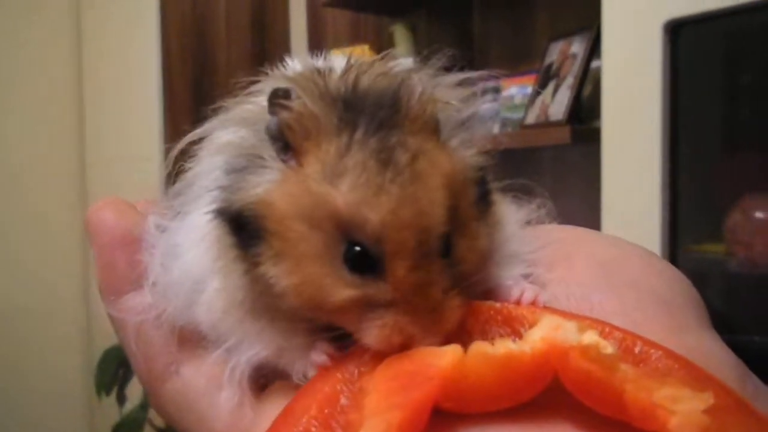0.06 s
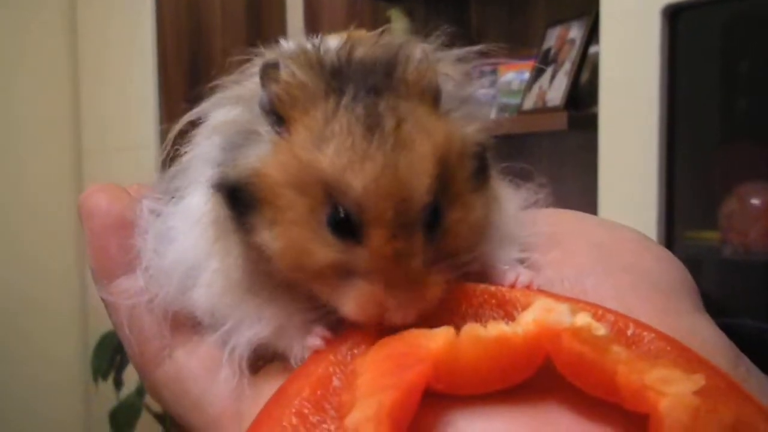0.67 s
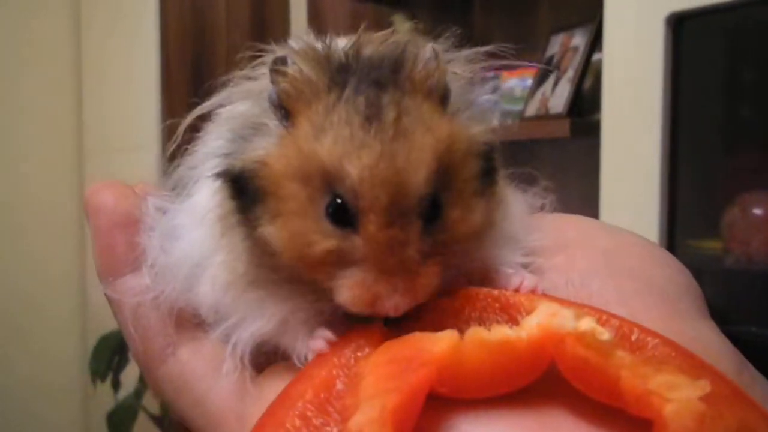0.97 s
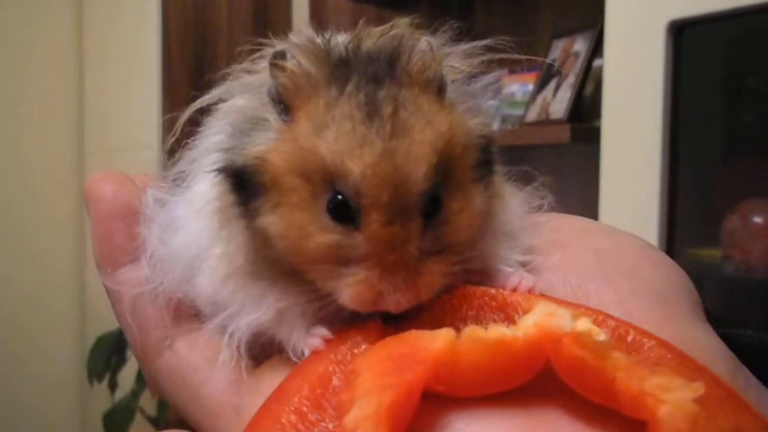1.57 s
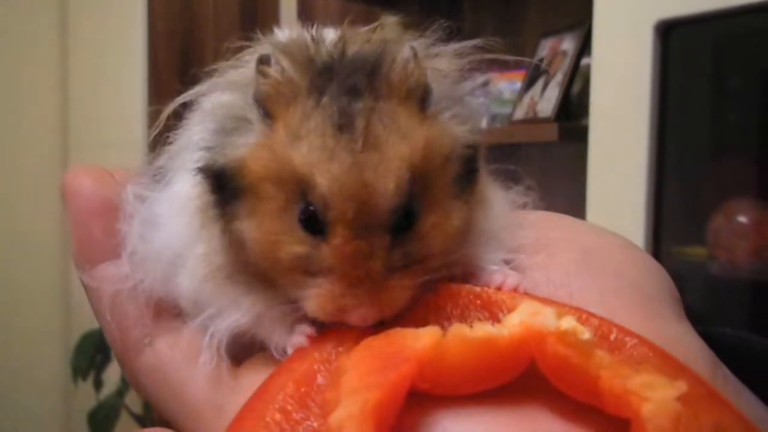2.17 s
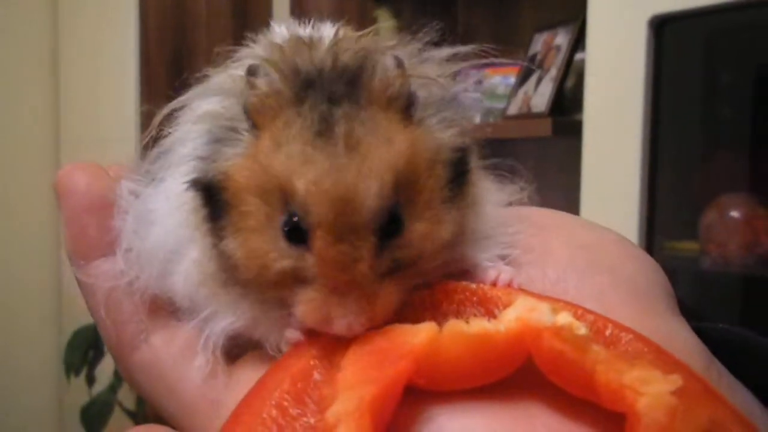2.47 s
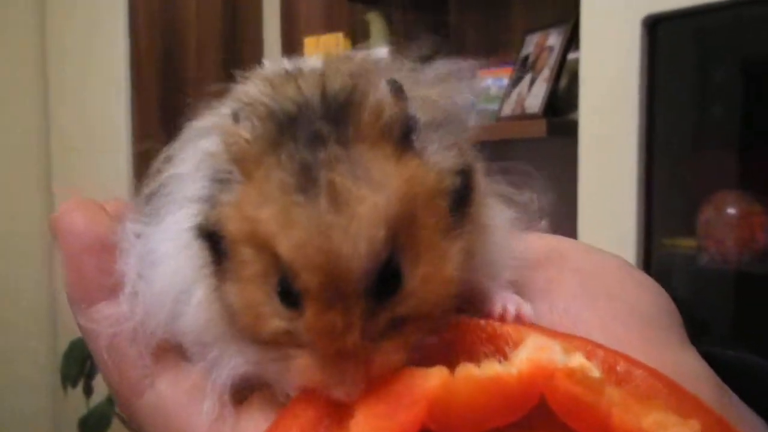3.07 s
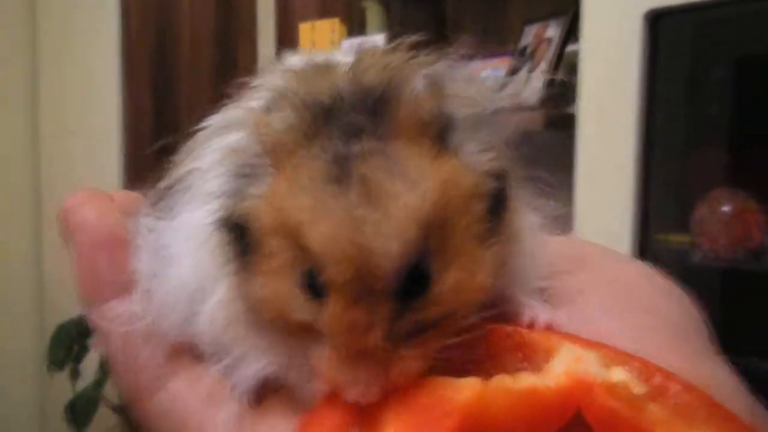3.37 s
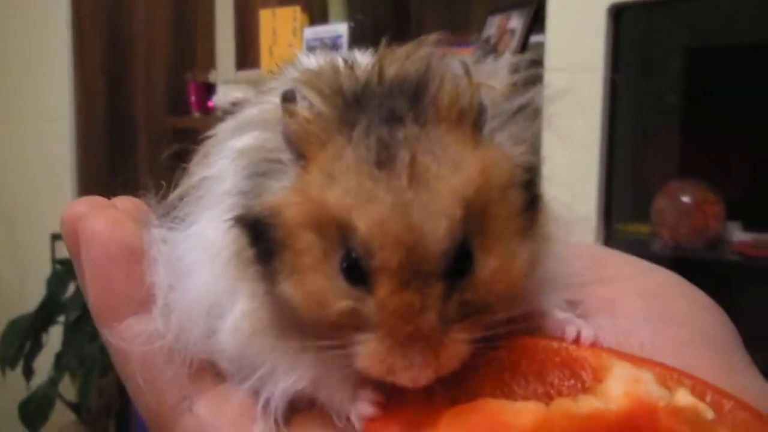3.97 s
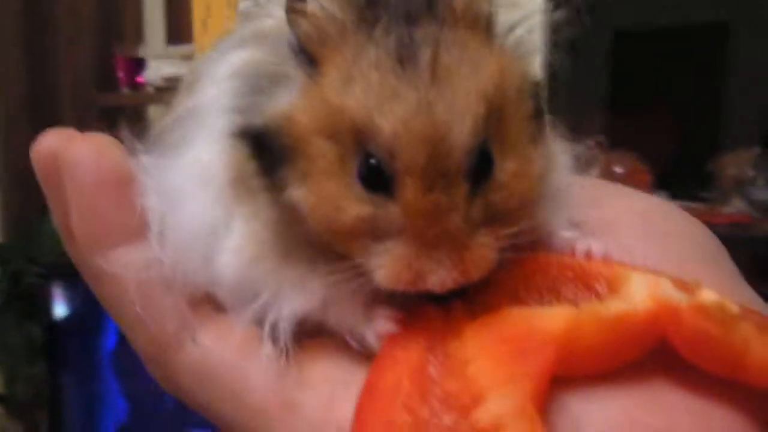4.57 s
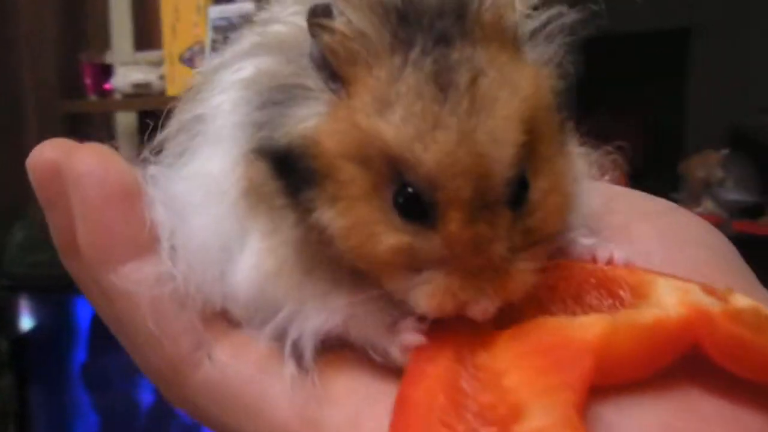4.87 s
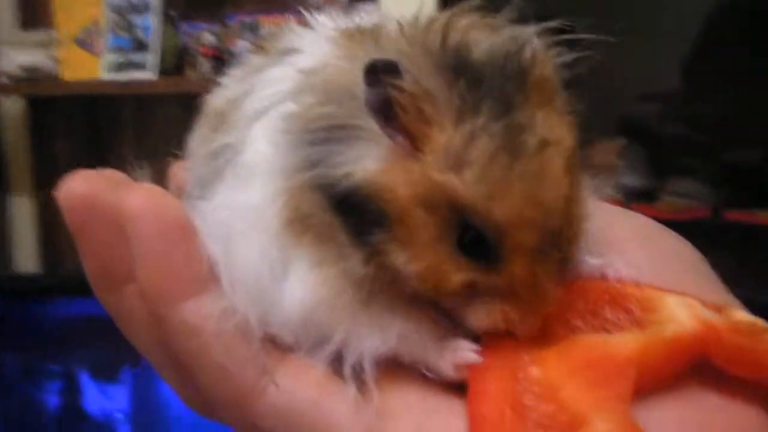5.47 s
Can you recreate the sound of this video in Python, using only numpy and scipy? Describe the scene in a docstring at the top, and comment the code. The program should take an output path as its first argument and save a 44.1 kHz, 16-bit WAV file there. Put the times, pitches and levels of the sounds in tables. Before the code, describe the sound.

A hamster nibbles a slice of bell pepper very close to a handheld microphone, in a quiet room with a faint steady hiss. Sharp little snaps open at about 0.2 seconds, with a light handling tap and creak. From 1 to 2.2 seconds the bites come in a quick run of tiny, bright, crisp crunches, several a second. They thin out, a small creak of the microphone's case comes at 2.8 seconds, and more crunches cluster from 3.1 to 3.4 seconds. At 3.5 seconds a finger slips on the case with a loud, juddering crack, the loudest sound, trailing into a brief hollow creak and low rubbing. Nibbling resumes around 3.9 seconds. Hollow finger knocks land at about 4.3, 4.6 and 5 seconds, with soft rubs between them, while scattered crisp snaps continue until the end at about 5.6 seconds.

```python
"""Hamster nibbling bell pepper

A hamster on a hand eats a slice, very close to a handheld camera in a quiet room.
Each bite is a quick run of tiny snaps of the crisp flesh, ringing briefly in the small mouth.
Fingers knock, creak and rub on the camera; once a grip slides and judders with a loud crack."""
import sys
import numpy as np
from scipy import signal
from scipy.fft import rfft, irfft
from scipy.io import wavfile
from scipy.ndimage import uniform_filter1d

SR = 44100
rng = np.random.default_rng(int(sys.argv[2]) if len(sys.argv) > 2 else 0)


def wav_out(sig):
    """Save sig, one row per channel (or a flat mono array), as 16-bit PCM at SR to the path in sys.argv[1]."""
    wavfile.write(sys.argv[1], SR, np.round(np.clip(np.atleast_2d(sig).T, -1, 1) * 32767).astype(np.int16))


N = 247393
BAND_LIMIT_HZ = 16000
HZ = np.maximum(np.fft.rfftfreq(4096, 1 / SR), 1)  # frequency axis of the gain curves


# Bites, and airy rustles at 2.346 s and 4.732 s:
# (start [s], end [s], level [dB], tilt [dB/oct], mouth ring [dB])
BITES_AND_RUSTLES = [(0.124, 0.173, -66, 2, 15.5), (0.283, 0.303, -52, 3, 3), (0.342, 0.371, -55.5, 5.5, 4),
                     (0.761, 0.78, -66.5, -1, 19), (1.154, 1.178, -52, -3, 18.5),
                     (1.257, 1.27, -51.5, -1.5, 17), (1.376, 1.398, -56, -3, 17.5),
                     (1.5, 1.509, -43, -1, 14), (1.518, 1.535, -54.5, 3, 14), (1.631, 1.647, -44, 0.5, 13),
                     (1.657, 1.663, -40, 1, 13.5), (1.777, 1.796, -50.5, -1, 15),
                     (1.885, 1.899, -42, 1, 13.5), (1.904, 1.921, -41, 3, 10),
                     (2.055, 2.066, -47, -2, 16.5), (2.069, 2.113, -55, 2.5, 10.5),
                     (2.2, 2.219, -45, 0.5, 16.5), (2.346, 2.367, -63, 12, -3),
                     (2.756, 2.791, -61.5, 1, 18.5), (2.906, 2.949, -61.5, 1, 17.5),
                     (3.088, 3.125, -55, -0.5, 15.5), (3.143, 3.176, -56, 4.5, 14),
                     (3.211, 3.3, -59.5, 5.5, 4), (3.321, 3.349, -55.5, 8, 5), (3.36, 3.378, -53, 8, 3),
                     (3.945, 3.966, -53.5, 5, 10.5), (4.01, 4.017, -43.5, 1, 5),
                     (4.127, 4.133, -35.5, 0, 3), (4.235, 4.251, -44, 5.5, 10), (4.732, 4.769, -60, 8.5, 0),
                     (4.978, 4.99, -46, 1.5, 11.5)]


def bites_and_rustles(snaps_per_run=5.5, min_gap_s=.0022, max_gap_s=.02,
                      crackle_db=-8, lead_s=.006, lag_s=.0027):
    """Bites and two faint airy rustles: short runs of tiny snaps and crackle."""
    out = np.zeros(N)
    for start, end, db, tilt_db, ring_db in BITES_AND_RUSTLES:
        length_s = max(end - start, min_gap_s)
        gap_s = np.clip(length_s / snaps_per_run, min_gap_s, max_gap_s)
        breaks = jerks(length_s + gap_s / 2, gap_s, scatter=0.27, scatter_db=3.5)
        breaks *= arch(len(breaks), edge_db=-1.5)
        breaks *= np.sqrt(length_s * SR) / np.linalg.norm(breaks)
        variants = [snap(start, tilt_db + 2 * tilt_shift, ring_db + 3 * ring_shift, uneven_db=2)
                    for tilt_shift, ring_shift in rng.uniform(-1, 1, (7, 2))]
        for k, at in enumerate(np.flatnonzero(breaks)):
            add(out, start + at / SR, amp(db) * breaks[at] * variants[k % len(variants)])
        crackle = grains(N // 20, per_s=1500, spread_db=4)[:round((lead_s + length_s + lag_s) * SR)]
        crackle *= signal.windows.tukey(len(crackle), .5)
        response = fracture(tilt_db, ring_db, jaw_factor(start), uneven_db=5.5)
        add(out, start - lead_s, amp(db + crackle_db) * signal.fftconvolve(crackle, response))
    return out


# Pepper skin breaks: (time [s], level [dB], tilt [dB/oct], mouth ring [dB])
SKIN_SNAPS = [(0.2251, -22, 3, 3), (0.2534, -19, 3.5, 13.5), (0.5167, -27.5, 4, 2), (0.658, -33.5, 6.5, 11),
              (0.968, -40, -2, 15), (1.162, -27.5, -7, 21.5), (1.1892, -35, 2, 16),
              (1.2556, -18.5, 4, 15.5), (1.5712, -33.5, 15, -2), (2.421, -42.5, -5, 24),
              (2.7575, -37.5, -13, 21.5), (3.0855, -30, -5, 15), (3.1903, -28, 7, 14.5),
              (3.3615, -29, 11.5, 16), (3.374, -20, 2.5, 7), (3.6273, -29, 7, -1), (3.917, -33, 12, -4),
              (4.94, -25.5, -2.5, -10), (5.0937, -31, 16, -2), (5.1176, -30, 11, -1),
              (5.3114, -26.5, -3, 5), (5.3804, -26.5, -4, 2), (5.5683, -32, 3.5, 16)]


def skin_snaps():
    """The tough skin gives way in single sharp snaps."""
    out = np.zeros(N)
    for time_s, db, tilt_db, ring_db in SKIN_SNAPS:
        add(out, time_s, amp(db) * snap(time_s, tilt_db, ring_db))
    return out


def snap(time_s, tilt_db, ring_db, uneven_db=4.5, run_on=0.75, decay_s=0.00075):
    """One break tears a few neighbouring cells within a millisecond or two."""
    t = np.arange(SR // 300) / SR
    tear = grains(len(t), per_s=9000, spread_db=-6.5) * np.exp(-t / decay_s)
    tear *= run_on / np.linalg.norm(tear)
    tear[0] = 1
    flesh = fracture(tilt_db, ring_db, jaw_factor(time_s), uneven_db)
    return signal.fftconvolve(tear / np.linalg.norm(tear), flesh)


# Bare snap spectrum: (frequency [Hz], gain [dB])
FLESH_SPECTRUM = [(200, -10.5), (1200, -3), (3200, -1.5), (4600, -1.5), (7000, 0), (9500, -2), (13000, -3),
                  (16000, -3)]
# Resonances around the teeth: (frequency [Hz], width [Hz], gain [dB])
MOUTH_MODES = [(5720, 296, 3.5), (6200, 730, -0.5), (6950, 270, -11.5), (10200, 970, -8),
               (11600, 800, -9.5)]


def fracture(tilt_db, ring_db, jaw=1, uneven_db=2):
    """One fracture of the flesh, with its own uneven colour, plus its ring in the mouth."""
    modes = [(hz * jaw, width_hz, db) for hz, width_hz, db in MOUTH_MODES]
    mouth_ring = np.hypot(1, amp(ring_db) * resonances(modes)) - 1
    ripple = np.interp(HZ, np.linspace(0, BAND_LIMIT_HZ, 14), rng.standard_normal(14))
    bare = spectrum(FLESH_SPECTRUM, HZ) * slope(tilt_db, pivot_hz=6030, flat_below_hz=3280)
    return impulse(bare * (amp(uneven_db * ripple) + mouth_ring))


# Mouth tuning: (time [s], frequency factor [ratio])
JAW_TUNING = [(0.2, 1.06), (0.75, 1.05), (1.2, 0.98), (1.9, 1.01), (2.8, 0.96), (3.35, 0.97), (4.0, 0.88),
              (4.24, 0.91), (5.0, 0.96)]


def jaw_factor(time_s):
    """The mouth opens and shifts its resonances."""
    return np.interp(time_s, *np.transpose(JAW_TUNING))


def chewing(level_db=-78, rest_from_s=3.8, rest_db=-9):
    """Faint wet ticks of the jaw, weaker once the hamster slows down."""
    effort = amp(rest_db * (np.arange(N) / SR > rest_from_s))
    ticks = effort * grains(N, per_s=25, spread_db=2.5)
    return amp(level_db) * signal.oaconvolve(ticks, fracture(tilt_db=1, ring_db=18))[:N]


# Camera case resonances: (frequency [Hz], width [Hz], gain [dB])
CASE_MODES = [(140, 56, -21.5), (303, 130, -10.5), (507, 34, 5), (664, 90, 1), (893, 150, -3.5),
              (1133, 96, -2), (1527, 140, -6), (1863, 195, -3), (2150, 140, -5.5), (2470, 120, -3),
              (2980, 360, -4), (3630, 870, -15), (4510, 680, -12), (5450, 530, -16.5), (7350, 660, -29),
              (8800, 760, -19.5), (11100, 1100, -28.5), (14300, 1700, -32)]
# Grip slips: (start [s], end [s], level [dB], tilt [dB/oct])
JUDDERS = [(3.5063, 3.5287, 15, -1.5), (3.5545, 3.564, -0.5, 2)]


def crack(fade_db=-8, lead_s=0.00035):
    """A sticking grip lets go: a fading run of stick-slip jerks rings the case."""
    out, case = np.zeros(N), resonances(CASE_MODES)
    for start, end, db, tilt_db in JUDDERS:
        slips = jerks(end - start, gap_s=.0016, scatter=0.48, scatter_db=3.5)
        slips *= np.sqrt(np.count_nonzero(slips)) * amp(np.linspace(0, fade_db, len(slips)))
        ring = impulse(case * slope(tilt_db, pivot_hz=1000, flat_below_hz=403), spread_s=0.000505)
        add(out, start - lead_s, -amp(db) * signal.fftconvolve(slips, ring))
    return out


# Light rub, case damped by the hand: (frequency [Hz], gain [dB])
DAMPED_SPECTRUM = [(100, -38), (400, -7.5), (700, 1), (1150, -4.5), (1700, -15), (3000, -16.5),
                   (4400, -14.5), (6500, -20.5), (9000, -32), (16000, -39)]
# Finger strokes: (start [s], peak [s], end [s], level [dB], tilt [dB/oct], bass [dB], case ring [0-1])
RUBS = [(3.453, 3.52, 3.545, -23, 5.5, 20, 1), (3.474, 3.484, 3.505, -45, 2, 2, 0.9),
        (3.504, 3.51, 3.535, -8, -1.5, -18, 0.7), (3.549, 3.549, 3.588, -18.5, -1, 14, 0.24),
        (3.618, 3.639, 3.690, -32, 2.5, 26.5, 0.6), (3.633, 3.679, 3.730, -36, 3, 28.5, 0.77),
        (3.681, 3.742, 3.880, -49.5, 4.5, 18, 0.9), (4.300, 4.312, 4.350, -41, 1, 5, 0.7),
        (4.647, 4.67, 4.780, -36.5, 1, 6, 0.35), (4.83, 4.836, 4.93, -33, 2.5, 9.5, 0.2),
        (5.018, 5.05, 5.105, -32, 3, 10, 0.1), (5.08, 5.107, 5.210, -41, 1.5, 1, 0),
        (5.400, 5.423, 5.460, -39, 1.5, 2, 0.4), (5.484, 5.56, 5.660, -40.5, 1.5, -6, 0.36)]


def rubs(bass_hz=480, rumble_db=-20, rumble_hz=150):
    """Skin slides on the case: friction grains swell and fade, ring it and shake the camera."""
    out, case, damped = np.zeros(N), resonances(CASE_MODES), spectrum(DAMPED_SPECTRUM, HZ)
    shake = amp(rumble_db) / np.hypot(1, (HZ / rumble_hz) ** 3) / np.hypot(1, (rumble_hz / 2 / HZ) ** 2)
    for start, peak, end, db, tilt_db, bass_db, ring in RUBS:
        t = np.arange(start, end, 1 / SR)
        stroke = np.interp(t, [start, peak, end], [0, 1, 0]) ** 1.1
        friction = grains(N // 10, per_s=6000, spread_db=1)[:len(t)]
        colour = case ** ring * damped ** (1 - ring) * slope(tilt_db, pivot_hz=1040, flat_below_hz=393)
        bass_shelf = amp(bass_db / (1 + (HZ / bass_hz) ** 4))
        response = impulse(colour * bass_shelf + shake)
        add(out, start, amp(db) * signal.fftconvolve(stroke * friction, response))
    return out


# Grip taps: (time [s], tick level [dB], low edge [Hz], high edge [Hz], thud level [dB])
KNOCKS = [(0.2530, -12.5, 550, 2500, -13), (1.2078, -14, 3000, 5000, -30), (4.2570, 0, 2100, 6340, 9),
          (4.2964, 4, 2070, 3270, -4), (4.3114, -11.5, 2900, 6000, -7), (4.5679, -1.5, 2230, 3270, -16),
          (4.9938, 1.5, 880, 5400, -7.5)]


def knocks():
    """Each tap is a hollow tick plus a thud."""
    out, body = np.zeros(N), thud(spread_s=0.00036)
    for time_s, tick_db, low_hz, high_hz, thud_db in KNOCKS:
        add(out, time_s, amp(tick_db) * tick(low_hz, high_hz) + amp(thud_db) * body)
    return out


# Case creaks: (start [s], end [s], relative level [dB], low edge [Hz], high edge [Hz])
CREAKS = [(0.294, 0.309, -12.5, 1510, 2300), (2.814, 2.822, 1, 2200, 2970)]


def creaks(level_db=7, thud_db=-11):
    """The case creaks under the fingers: a few almost evenly spaced ticks swell and fade."""
    out, body = np.zeros(N), amp(thud_db) * thud()
    for start, end, db, low_hz, high_hz in CREAKS:
        slips = jerks(end - start, gap_s=.00243, scatter=0.065, scatter_db=0.5)
        slips *= arch(len(slips), edge_db=-9)
        add(out, start, amp(db + level_db) * signal.fftconvolve(slips, tick(low_hz, high_hz) + body))
    return out


# Grip tick resonances: (frequency [Hz], width [Hz], gain [dB])
TICK_MODES = [(1090, 710, 2), (1670, 310, -5), (2320, 180, -10), (2760, 350, -7.5), (4090, 850, -5),
              (6800, 2800, -7.5)]


def tick(low_hz, high_hz, echo_db=-11, echo_s=0.000874):
    """A band-limited tick in the grip, made hollow by an echo across the case."""
    band = 1 / np.hypot(1, (low_hz / HZ) ** 5) / np.hypot(1, (HZ / high_hz) ** 4)
    hollow = abs(1 + amp(echo_db) * np.exp(-2j * np.pi * HZ * echo_s))
    return impulse(resonances(TICK_MODES) * band * hollow, spread_s=0.00021)


# Whole-camera resonances: (frequency [Hz], width [Hz], gain [dB])
THUD_MODES = [(165, 154, -0.5), (545, 87, -1.5), (986, 240, -6)]


def thud(spread_s=0):
    """A tap shakes the whole camera."""
    return impulse(resonances(THUD_MODES), spread_s)


# Stick-slip notes: (start [s], end [s], centre pitch [Hz], level [dB])
GROANS = [(3.521, 3.549, 515, -32), (3.552, 3.586, 520, -31.5)]


def groans(sag_hz=80, jitter=0.15, overtone_db=-16):
    """Sliding skin locks on to a low case mode: a short, hollow note that wobbles and sags."""
    out = np.zeros(N)
    for start, end, hz, db in GROANS:
        t = np.arange(start, end, 1 / SR)
        wobble = uniform_filter1d(rng.standard_normal(N // 10), size=100)
        sag = np.linspace(sag_hz, -sag_hz, len(t))
        pitch_hz = hz * (1 + jitter * wobble[:len(t)] / wobble.std()) + sag
        phase = 2 * np.pi * np.cumsum(pitch_hz) / SR
        note = np.sin(phase) + amp(overtone_db) * np.sin(2 * phase)
        add(out, start, amp(db) * note * signal.windows.tukey(len(t), .5))
    return out


def room(direct, wet_db=-22, t60_s=0.26, predelay_s=.006):
    """The furnished room adds a faint, short tail of uneven reflections."""
    t = np.arange(SR // 3) / SR
    tail = grains(len(t), per_s=6200, spread_db=18) * amp(-60 * t / t60_s) * (t > predelay_s)
    return direct + amp(wet_db) * signal.oaconvolve(direct, tail / np.linalg.norm(tail))[:N]


# Room tone and hiss: (frequency [Hz], relative density [dB])
FLOOR_SPECTRUM = [(15, -42), (25, -14.5), (165, 0.5), (527, -5.5), (672, -7), (857, -7), (981, -9),
                  (3130, -17), (3390, -17), (6660, -19.5), (7830, -18.5), (9990, -20), (11700, -23),
                  (12700, -19), (15800, -23)]


def noise_floor(noise_db=-56, hum_db=-76, mains_hz=50):
    """Steady low room tone, microphone hiss and a trace of mains hum."""
    colour = spectrum(FLOOR_SPECTRUM, np.fft.rfftfreq(N, 1 / SR))
    noise = irfft(rfft(rng.standard_normal(N)) * colour, N)
    hum = np.sin(2 * np.pi * mains_hz * np.arange(N) / SR)
    return amp(noise_db) * noise / noise.std() + amp(hum_db) * hum


def whine(level_db=-76, pitch_hz=12650, waver_hz=160):
    """A very faint high whine wavers and flutters."""
    drift, flutter = uniform_filter1d(rng.standard_normal((2, N)), size=1500)
    phase = 2 * np.pi * np.cumsum(pitch_hz + waver_hz * drift / drift.std()) / SR
    return amp(level_db) * flutter / flutter.std() * np.sin(phase)


def jerks(length_s, gap_s, scatter, scatter_db):
    """Stress builds and lets go repeatedly: clicks at uneven gaps, the first at once, total energy 1."""
    gap_draws, size_draws = np.clip(rng.standard_normal((2, 64)), -2, 2)
    gaps_s = gap_s * np.exp(scatter * gap_draws)
    at = np.round((np.cumsum(gaps_s) - gaps_s[0]) * SR).astype(int)
    out = np.zeros(max(round(length_s * SR), 1))
    inside = at < len(out)
    out[at[inside]] = amp(scatter_db * size_draws[inside])
    return out / np.linalg.norm(out)


def grains(samples, per_s, spread_db):
    """Random clicks of uneven size, at least one, mean power 1."""
    chance, size = rng.random(samples), rng.standard_normal(samples)
    struck = chance <= max(per_s / SR, chance.min())
    clicks = struck * np.sign(size) * amp(spread_db * np.minimum(abs(size), 2))
    return clicks / np.sqrt(np.mean(clicks ** 2))


def impulse(gain, spread_s=0):
    """Causal impulse response with this gain: a sharp start, then the ring."""
    log_gain = np.log(np.maximum(gain, 1e-6))
    mirrored = np.concatenate([log_gain, log_gain[-2:0:-1]])
    log_minimum_phase = np.conj(signal.hilbert(mirrored))[:len(HZ)]
    # bending waves in a shell bring the treble first; 1 kHz is delayed by spread_s
    lag_rad = 4 * np.pi * spread_s * np.sqrt(1000 * HZ)
    return irfft(np.exp(log_minimum_phase - 1j * lag_rad))


def resonances(modes, steepness=1.4):
    """Gain curve of damped modes with steep skirts."""
    power = sum(amp(db) ** 2 / (1 + ((HZ ** 2 - hz ** 2) / (HZ * width_hz)) ** 2) ** steepness
                for hz, width_hz, db in modes)
    return np.sqrt(power)


def spectrum(points, hz):
    """Gain curve through points joined on a log-frequency axis."""
    points_hz, db = np.transpose(points)
    return amp(np.interp(np.log(hz + 1), np.log(points_hz + 1), db))


def slope(tilt_db, pivot_hz, flat_below_hz):
    """Gain curve tilted by tilt_db per octave."""
    return amp(tilt_db * np.log2(np.maximum(HZ, flat_below_hz) / pivot_hz))


def arch(samples, edge_db):
    """Envelope: 0 dB in the middle, edge_db at both ends."""
    return amp(edge_db * np.linspace(-1, 1, samples) ** 2)


def amp(db):
    """Decibels to gain."""
    return 10 ** (np.asarray(db) / 20)


def add(mix, time_s, sound):
    """Mixes a sound in at time_s."""
    part = mix[max(round(time_s * SR), 0):][:len(sound)]
    part += sound[:len(part)]


def scene():
    """Nibbling comes through the air; handling comes straight through the case."""
    background = noise_floor()
    nibbling = room(bites_and_rustles() + skin_snaps() + chewing())
    handling = crack() + rubs() + knocks() + creaks() + groans()
    return (nibbling + handling + background + whine())[None]


def record(dry, notch_hz=7900, width_hz=1100, depth_db=-17):
    """The camera has a narrow treble notch, then its band limit."""
    notched = signal.lfilter(*signal.iirnotch(notch_hz, notch_hz / width_hz, SR), dry)
    heard = notched + amp(depth_db) * (dry - notched)
    lowpass = signal.firwin(511, BAND_LIMIT_HZ, window=("kaiser", 9), fs=SR)
    return signal.oaconvolve(heard, lowpass[None], "same")


dry = scene()
out = record(dry)
wav_out(out)
```